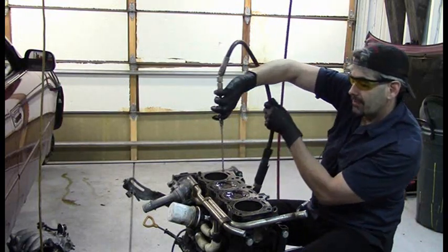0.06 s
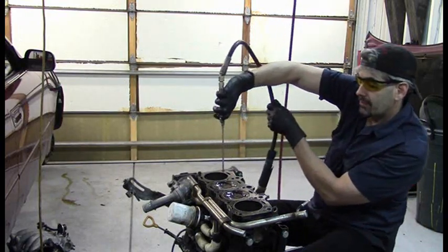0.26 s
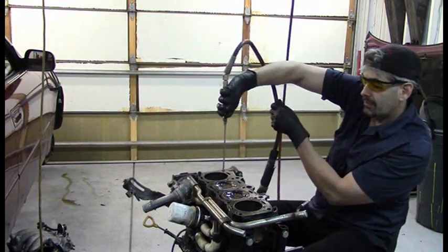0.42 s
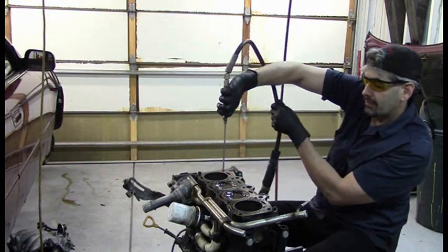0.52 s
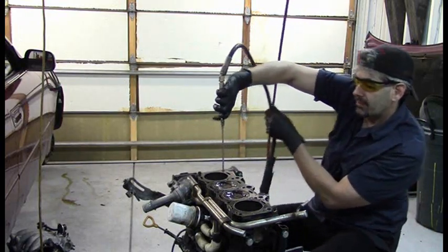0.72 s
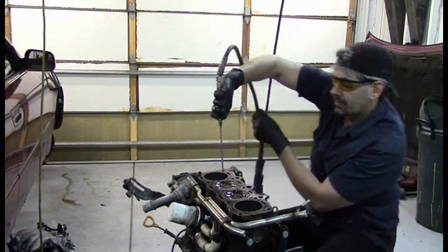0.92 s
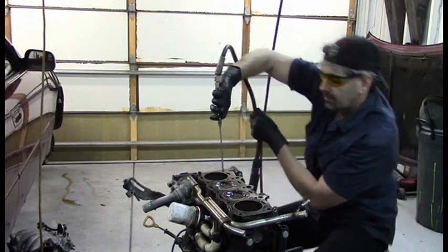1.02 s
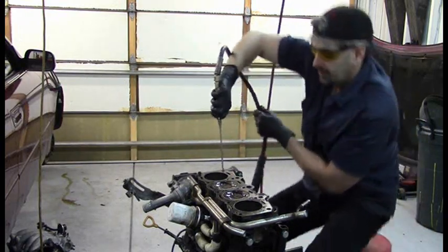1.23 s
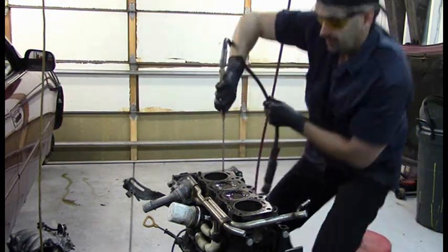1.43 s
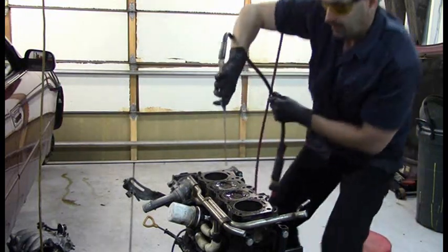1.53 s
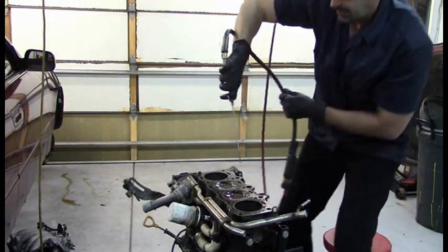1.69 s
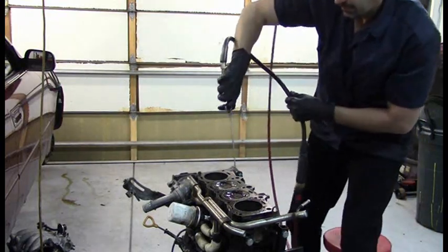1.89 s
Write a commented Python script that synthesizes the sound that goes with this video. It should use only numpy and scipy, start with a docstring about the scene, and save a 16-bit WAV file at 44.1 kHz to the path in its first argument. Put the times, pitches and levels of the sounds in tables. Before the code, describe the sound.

After a faint cloth rustle, an air gun hisses four times in quick succession against a metal engine block in an echoing garage. Each blast has a breathy ring, and the last grows rough before cutting off.

```python
"""A compressed-air blow gun fires four blasts into an engine block in a garage.
After a soft shuffle of cloth, the valve leaks a little before the first three blasts. The jet hisses,
swells as it bears on the metal and blows a hollow of the block into a breathy ring whose pitch follows
the aim. Edges whistle, the air line thumps, a last leak dies away, and the hard room answers."""
import sys
import numpy as np
from scipy import signal
from scipy.fft import rfft, irfft, next_fast_len
from scipy.io import wavfile
from scipy.ndimage import uniform_filter1d, map_coordinates

SR = 44100
rng = np.random.default_rng(int(sys.argv[2]) if len(sys.argv) > 2 else 0)


def bounce(signal):
    """Save signal as a 16-bit WAV file at the path given by the first command-line argument."""
    frames = np.transpose(np.atleast_2d(signal))
    limited = np.clip(frames, -1, 1)
    pcm = np.round(limited * 32767).astype(np.int16)
    wavfile.write(sys.argv[1], SR, pcm)


N = 85995
T = np.arange(N) / SR


def amp(db):
    """Decibels to gain."""
    return 10 ** (np.asarray(db) / 20)


def unit(x):
    """Scale to rms 1."""
    return x / np.sqrt(np.mean(x ** 2) + 1e-20)


def along(points, hz):
    """Read (frequency, value) points on a log axis."""
    freqs, values = np.transpose(points)
    return np.interp(np.log(hz + 1), np.log(freqs + 1), values)


def curve(points):
    """Read (time, value) points at every sample."""
    return np.interp(T, *np.transpose(points))


def wobble(per_s):
    """A smooth random modulator, per_s knots a second."""
    return map_coordinates(rng.standard_normal(1024), [T * per_s], mode="mirror")


def flutter(depth_db=1.57, per_s=27):
    """Turbulence as a flickering gain."""
    return amp(depth_db * wobble(per_s))


def filtered(x, response):
    """EQ x with a gain that is a function of frequency."""
    size = next_fast_len(N + SR // 2)
    return irfft(rfft(x, size) * response(np.fft.rfftfreq(size, 1 / SR)), size)[..., :N]


def noise(colour):
    """Coloured noise, rms 1."""
    return unit(filtered(rng.standard_normal(N), lambda hz: amp(along(colour, hz))))


def blown(hz, width_hz):
    """A resonance driven by turbulence, rms 1; its centre may glide."""
    a, b = filtered(rng.standard_normal((2, N)), lambda f: 1 / (1 + (f / (.78 * width_hz)) ** 2))
    phase = 2 * np.pi * np.cumsum(hz * np.ones(N)) / SR
    return unit(a * np.cos(phase) + b * np.sin(phase))


def ringing(modes):
    """A stack of blown resonances, rms 1."""
    return unit(sum(amp(db) * blown(hz, width) for hz, width, db in modes))


def gate(start, end, attack, release):
    """Ramp up at start, ramp down at end."""
    return np.clip((T - start) / attack, 0, 1) * np.clip(1 - (T - end) / release, 0, 1)


def burst(start, db, t60):
    """A hard attack with an exponential tail."""
    return (T >= start) * amp(db) * np.exp(-np.log(1000) * np.abs(T - start) / t60)


# colour of the room tone (frequency [Hz], level [dB])
ROOM_TONE_EQ = [(20, 1.5), (55, -2), (90, -9), (350, -20), (650, -21), (1800, -35), (2600, -24),
                (3500, -25), (5500, -30), (8000, -40), (15000, -36)]
def room_tone():
    """A faint, bass-heavy bed of noise."""
    return amp(-54.5) * noise(ROOM_TONE_EQ)


# envelope of the shuffle (time [s], level [dB])
SHUFFLE_ENV = [(0, -48.5), (.04, -50), (.09, -58), (.15, -51), (.2, -54)]
# colour of the cloth (frequency [Hz], level [dB])
SHUFFLE_EQ = [(60, -12), (150, -13), (230, -1), (360, -3), (550, -20), (1800, -22), (2700, -19.5),
              (3600, -29), (5500, -25), (9000, -29), (14000, -35)]
def shuffle():
    """Cloth and gloves rub softly until the first blast."""
    return (T < TRIGGER_PULLS[0][0]) * amp(curve(SHUFFLE_ENV)) * noise(SHUFFLE_EQ)


# reverb decay (frequency [Hz], T60 [s])
REVERB_DECAY = [(100, 0.89), (600, 0.49), (1300, 0.5), (2600, 0.51), (4500, 0.43), (7500, 0.37),
                (10000, 0.29), (14000, 0.22)]
# reverb colour (frequency [Hz], level [dB])
REVERB_EQ = [(60, -1), (300, -8.5), (700, -1.5), (1100, -5.5), (2000, -1.5), (2700, -2), (3600, -5),
             (7500, -4.5), (12000, -3.5)]
def echo(predelay_s=.006):
    """One random room response; each frequency dies at its own speed."""
    hz, t, grains = signal.stft(rng.standard_normal(SR * 2 // 3), SR, nperseg=256)
    decay = np.exp(-np.log(1000) * t / along(REVERB_DECAY, hz)[:, None])
    energy = SR * t[-1] * np.mean(decay ** 2, axis=1, keepdims=True)
    decay *= amp(along(REVERB_EQ, hz))[:, None] / np.sqrt(energy)
    tail = signal.istft(grains * decay, SR, nperseg=256)[1]
    return np.pad(tail, (int(predelay_s * SR), 0))


def garage(x, crossfade_s=.1):
    """The room's answer, crossfading through fresh echoes as nozzle and body move."""
    hop, wet = int(crossfade_s * SR), np.zeros(N + 2 * SR)
    x = np.pad(x, (hop, 2 * hop))
    for i in range(0, N + hop, hop):
        part = signal.fftconvolve(x[i:i + 2 * hop] * signal.windows.cosine(2 * hop), echo())
        wet[i:i + len(part)] += part
    return wet[hop:hop + N]


# resonances of the tick (frequency [Hz], width [Hz], level [dB])
TICK_RING = [(902, 300, -0.5), (2700, 500, -17), (3900, 300, -8), (5470, 950, -2)]
def tick():
    """One faint handling tick."""
    return burst(start=.021, db=-39, t60=.025) * ringing(TICK_RING)


# leak cues (start [s], end [s], start level [dB], end level [dB])
LEAK_CUES = [(0.154, 0.208, -50.5, -38), (0.208, 0.212, -34, -30.5), (0.468, 0.518, -35, -26),
             (0.846, 0.892, -34, -30), (1.594, 1.849, -28, -51)]
# colour of the leak (frequency [Hz], level [dB])
LEAK_EQ = [(50, -13), (400, -12.5), (1500, -7), (2200, -8), (2750, 0.5), (3500, -4.5), (5000, -5.5),
           (7700, -5), (9500, -11.5), (15000, -27)]
def leaks(fade_s=.0093):
    """Thin air slips past the half-pressed valve."""
    envelope = sum(gate(start, end, fade_s, fade_s) * amp(curve([(start, from_db), (end, to_db)]))
                   for start, end, from_db, to_db in LEAK_CUES)
    return envelope * noise(LEAK_EQ)


# blasts, mixed against the hiss (open [s], close [s], hollow [dB], rasp [dB], fizz [dB])
TRIGGER_PULLS = [(0.215, 0.417, -4, -3, -17), (0.517, 0.72, -9.5, -10, -13),
                 (0.896, 1.113, -6.5, -4, -13.5), (1.238, 1.594, -6, -24, -11)]
# force of the jet on the metal (time [s], level [dB])
FORCE_ENV = [(.22, -22.5), (.25, -22.5), (.282, -13.5), (.335, -15), (.39, -15), (.416, -15.5), (.52, -18),
             (.58, -17.5), (.67, -12), (.718, -12), (.9, -17.5), (.98, -16), (1.08, -13), (1.113, -21),
             (1.24, -16.5), (1.34, -17.5), (1.39, -13.5), (1.435, -12), (1.455, -16.5), (1.505, -11),
             (1.535, -14), (1.565, -12), (1.594, -10)]
# bright hiss, midrange rasp and airy fizz (frequency [Hz], level [dB])
HISS_EQ = [(300, -30), (1500, -13), (3300, -19), (4700, -6), (5300, -5), (6200, -2), (7700, -3), (8400, -8),
           (10000, -12), (15000, -40)]
RASP_EQ = [(500, -26), (1400, -5), (2200, -2), (3000, -2), (3400, -0.5), (3900, 2.5), (4600, -1),
           (6000, -18), (12000, -91)]
FIZZ_EQ = [(4000, -19), (8000, -5), (9500, -5), (11200, 3), (12200, -6.5), (13300, -3.5), (14200, -34),
           (15300, -23)]
OPEN_S, CLOSE_S = .0074, .0078  # valve travel
def jet():
    """Hiss, rasp, fizz and rings ride the jet's force; the valve gates them with roar and whistles."""
    hollow_ring, steady = hollow(), steady_ring()
    hiss, rasp, fizz = [noise(colour) * flutter() for colour in (HISS_EQ, RASP_EQ, FIZZ_EQ)]
    force, low_end, edge_tones = amp(curve(FORCE_ENV)), roar(), whistles()
    air = np.zeros(N)
    for start, end, hollow_db, rasp_db, fizz_db in TRIGGER_PULLS:
        spray = hiss + amp(rasp_db) * rasp + amp(fizz_db) * fizz
        rings = steady + amp(hollow_db) * hollow_ring
        air += gate(start, end, OPEN_S, CLOSE_S) * (force * (spray + rings) + low_end + edge_tones)
    return air * flutter(depth_db=.5, per_s=55)


# glide of the hollow under the nozzle (time [s], pitch [Hz])
AIM_PITCH = [(.22, 2560), (.42, 2622), (.52, 2626), (.72, 2633), (.9, 2260), (1.02, 2280), (1.075, 2537),
             (1.11, 2893), (1.24, 2488), (1.32, 2390), (1.42, 2250), (1.505, 2091), (1.55, 2346),
             (1.594, 2724)]
# resonances of the hollow (pitch ratio [x], width [Hz], level [dB])
HOLLOW_RING = [(1, 590, -0.5), (1.78, 300, -4), (2.25, 280, -5.5), (2.8, 1600, -3.5)]
def hollow():
    """A blown hollow of the block; its breathy pitch follows the aim and drifts a little."""
    pitch = curve(AIM_PITCH) * (1 + .02 * wobble(per_s=40))
    return ringing([(ratio * pitch, width, db) for ratio, width, db in HOLLOW_RING]) * flutter()


# resonances of the steady ring (frequency [Hz], width [Hz], level [dB])
STEADY_RING_MODES = [(2620, 230, 0), (4620, 300, -4), (5900, 300, -6)]
# envelope of the steady ring, against the hiss (time [s], level [dB])
STEADY_RING_ENV = [(.22, -13), (.4, -11.5), (.7, -15), (.9, -20), (1.5, -36), (1.58, -15.5)]
def steady_ring():
    """A narrow, fixed-pitch ring sounds with the blasts."""
    return amp(curve(STEADY_RING_ENV)) * ringing(STEADY_RING_MODES)


# envelope of the roar (time [s], level [dB])
ROAR_ENV = [(.22, -37), (.25, -28.5), (.31, -26), (.41, -29), (.52, -32), (.7, -27), (.9, -26), (.97, -29),
            (1.08, -28), (1.113, -32.5), (1.26, -28), (1.33, -36), (1.39, -28.5), (1.594, -39)]
# colour of the roar (frequency [Hz], level [dB])
ROAR_EQ = [(20, 3.5), (40, -2), (90, -0.5), (180, 0.5), (300, 3.5), (700, 4), (1000, -4.5), (1600, -7.5),
           (3500, 1.5), (9000, -52.5)]
def roar():
    """Deflected air gives the blasts their low body."""
    return amp(curve(ROAR_ENV)) * noise(ROAR_EQ) * flutter()


# thump cues (time [s], level [dB])
THUMP_CUES = [(0.217, -33.5), (0.418, -29), (0.721, -28.5), (.897, -34.5), (1.236, -29.5), (1.594, -36)]
# colour of the thump (frequency [Hz], level [dB])
THUMP_EQ = [(20, -18), (45, 1), (85, -6.5), (150, -10), (300, -4), (1000, -50)]
def thumps():
    """The air line thumps, with a softened attack, as the valve opens or shuts."""
    envelope = sum(burst(start, db, t60=.16) for start, db in THUMP_CUES)
    return uniform_filter1d(envelope, size=400) * noise(THUMP_EQ)


# spit cues (time [s], level [dB])
SPIT_CUES = [(0.222, -17), (0.9, -27.5)]
# resonances of the spit (frequency [Hz], width [Hz], level [dB])
SPIT_RING = [(1031, 55, -5.5), (1207, 58, -3), (2550, 150, -0.5)]
def spits():
    """The valve spits as it snaps open for the first and third blasts."""
    return sum(burst(start, db, t60=.087) for start, db in SPIT_CUES) * ringing(SPIT_RING)


# whistle cues (centre [s], half length [s], pitch [Hz], level [dB])
WHISTLE_CUES = [(1.108, 0.0038, 2880, -13), (1.245, 0.0085, 5220, -17.5), (1.32, 0.015, 5140, -24),
                (1.41, 0.047, 5390, -19), (1.492, 0.026, 6270, -14)]
def whistles():
    """The jet catches an edge and whistles briefly; the higher the tone, the wider its band."""
    return sum(amp(db) * np.exp(-((T - centre) / half) ** 2 / 2) * blown(hz, width_hz=.076 * hz)
               for centre, half, hz, db in WHISTLE_CUES)


# swell of the overload-like noise (time [s], level [dB])
OVERLOAD_ENV = [(1.35, -52), (1.41, -25), (1.46, -25.5), (1.51, -18.5), (1.54, -17), (1.575, -14.5),
                (1.594, -19.5)]
# its colour (frequency [Hz], level [dB])
OVERLOAD_EQ = [(20, 0), (70, 3), (150, 0.5), (400, 4), (1300, -1.5), (3600, 0), (6000, -11), (10500, -3.5),
               (14000, -15)]
def overload_noise():
    """A dry, broadband noise like overload builds late in the last blast and cuts off with it."""
    last_blast = gate(*TRIGGER_PULLS[-1][:2], OPEN_S, CLOSE_S)
    return last_blast * amp(curve(OVERLOAD_ENV)) * noise(OVERLOAD_EQ)


def scene():
    """Gun and handling feed the reverb; the rest stays dry. Both channels are alike."""
    direct = jet() + leaks() + spits() + thumps() + tick() + shuffle()
    mono = direct + garage(direct) + overload_noise() + room_tone()
    return np.array([mono, mono])


def record(dry):
    """Soft saturation rounds the highest peaks, then a steep low-pass trims the top."""
    rounded = dry / (1 + np.abs(dry) ** 8) ** (1 / 8)
    return filtered(rounded, lambda hz: hz < 15430)


dry = scene()
out = record(dry)
bounce(out)
```